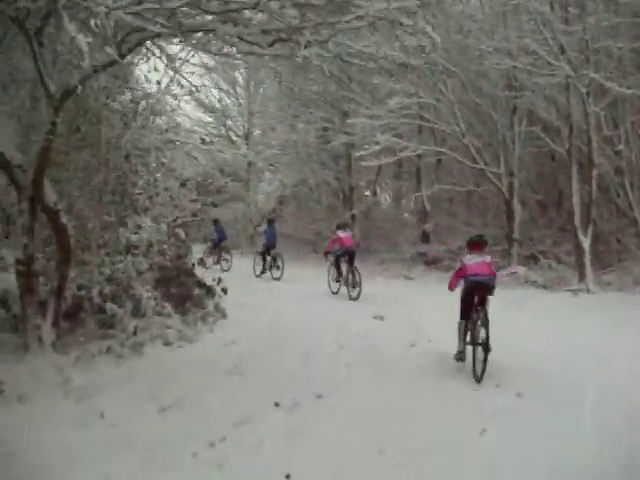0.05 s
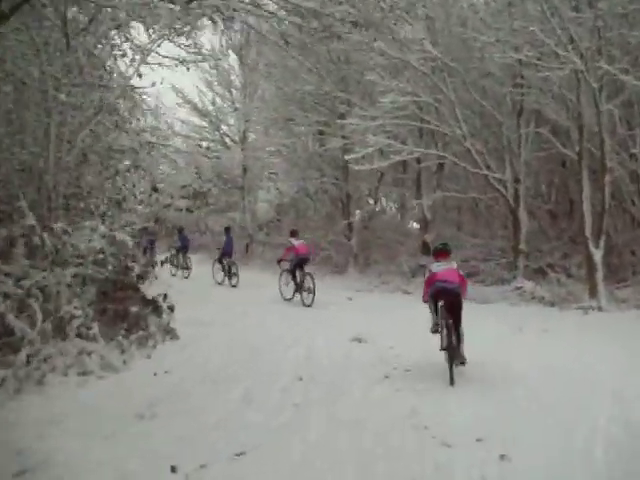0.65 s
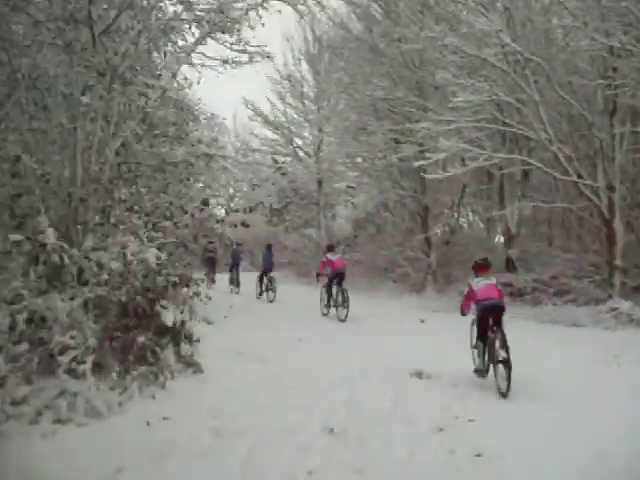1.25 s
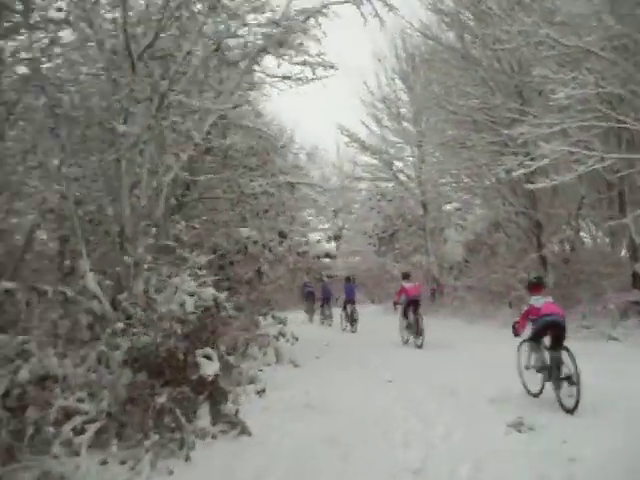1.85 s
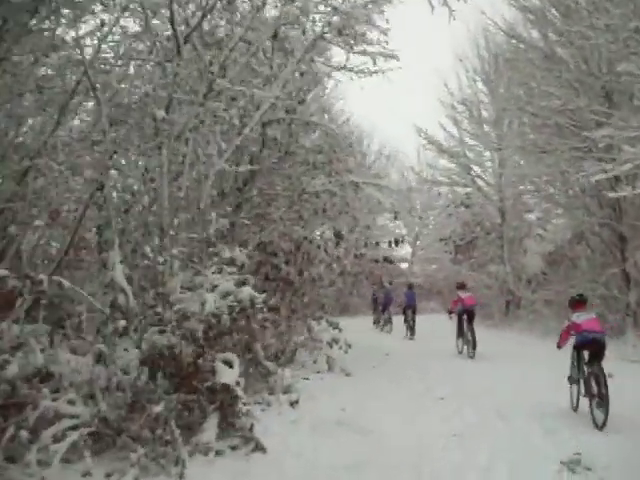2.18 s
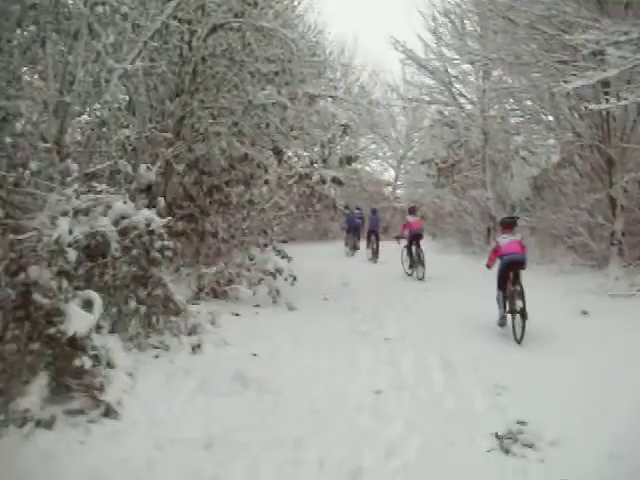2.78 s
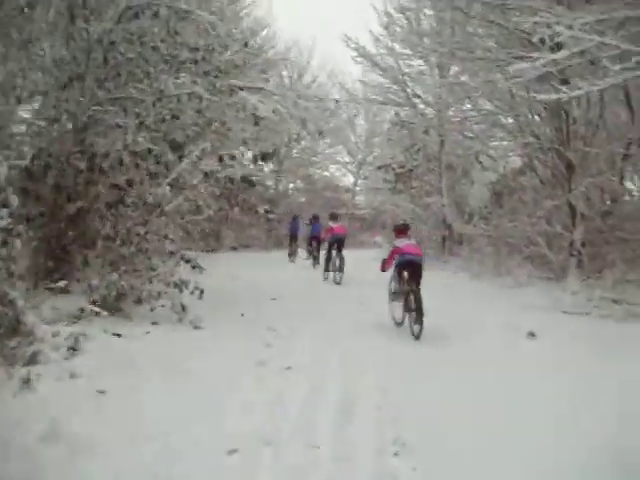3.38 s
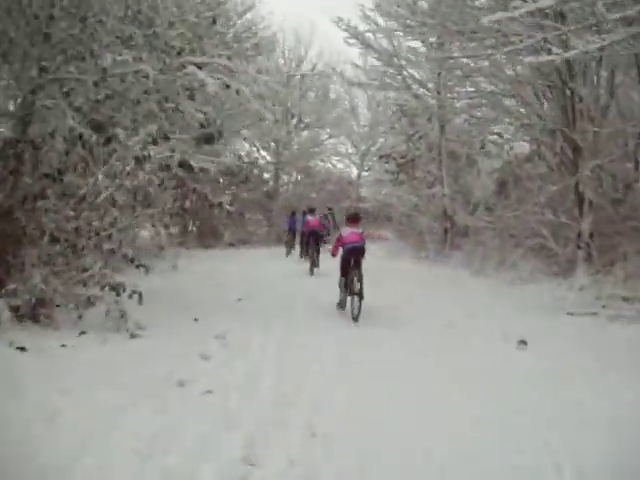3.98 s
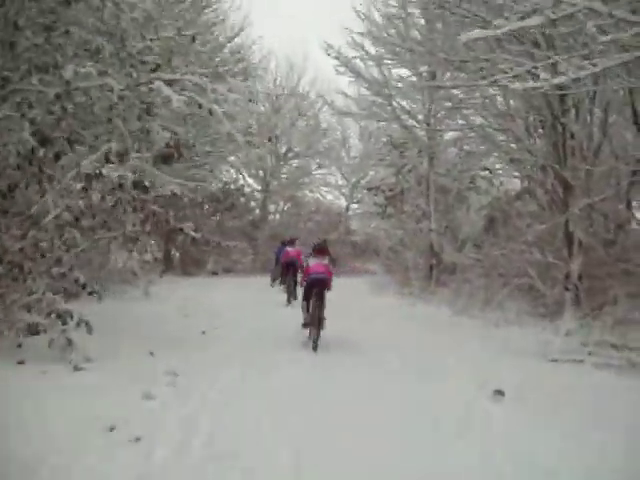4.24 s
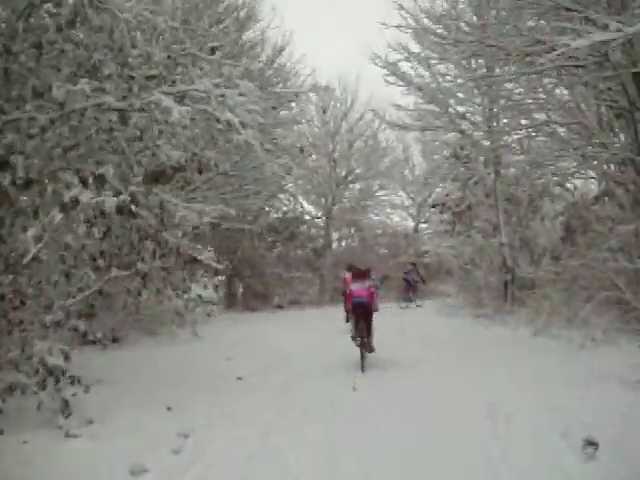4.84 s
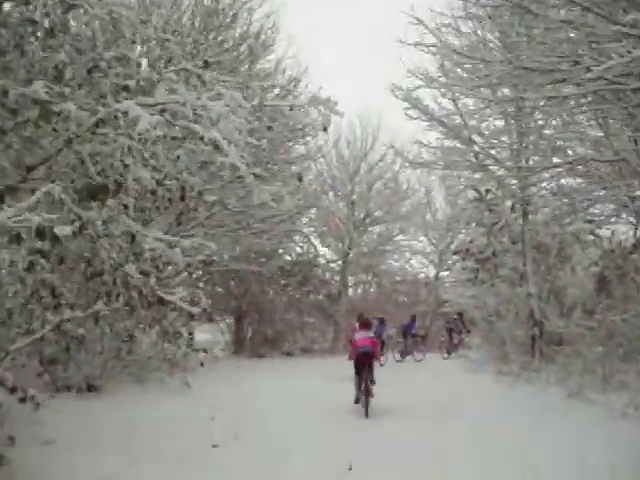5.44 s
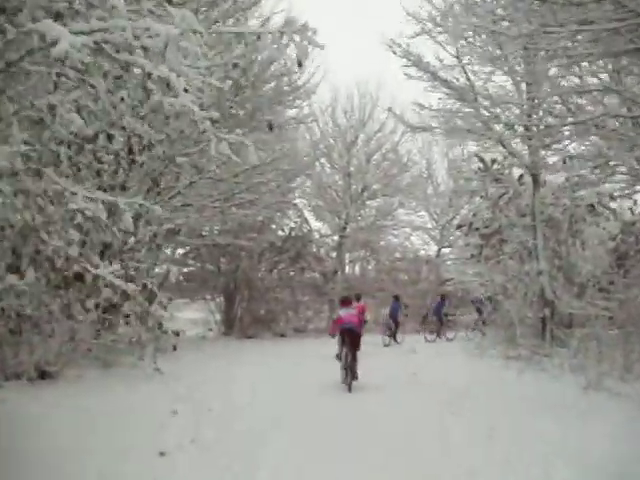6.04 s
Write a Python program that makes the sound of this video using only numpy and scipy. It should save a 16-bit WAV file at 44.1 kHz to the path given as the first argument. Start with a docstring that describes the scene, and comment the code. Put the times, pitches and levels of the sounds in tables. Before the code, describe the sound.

Low, lumpy wind buffets a microphone fixed to a bicycle riding outdoors over snow. A quick chain rattle and one loud, sharp crack come within the first second. After that, clusters of dull knocks and small ticks mark the bumps, over a soft hiss and crunch from the tyres. A faint hum joins about halfway, and the wind eases near the end. Everything sounds close and slightly muffled.

```python
"""Bicycle on a snowy path

A woodland path, heard from a small camera mounted on the bicycle: one narrow-band microphone, all close.
Wind eddies rumble right on its port; just below, the tyres hiss and crunch as they pack the snow.
Ruts and bumps make the camera judder and knock in its mount, and one hard crack overloads the input.
Grit ticks on the bicycle, the chain slaps once, and two low hums come and go as it rolls."""
import sys
import numpy as np
from scipy import signal
from scipy.fft import rfft, irfft, next_fast_len
from scipy.io import wavfile

SR = 44100
rng = np.random.default_rng(int(sys.argv[2]) if len(sys.argv) > 2 else 0)


def master(y):
    """Save y as 16-bit WAV."""
    cut = np.clip(np.atleast_2d(y).T, -1, 1)
    pcm = np.round(cut * 32767)  # scale
    wavfile.write(sys.argv[1], SR, pcm.astype(np.int16))


N = 273861
TIME = np.arange(N) / SR

# the camera knocks in its mount, each knock with its own strength and pitch:
# (time [s], strength [dB], pitch [Hz])
MOUNT_KNOCKS = [(0.065, -14, 410), (0.0849, -17, 400), (0.4681, -20, 430), (0.5842, -22.5, 300),
                (0.658, -21.5, 380), (0.7134, -11, 336), (0.7725, -14.5, 280), (0.7901, -17, 320),
                (1.2153, -19, 310), (1.9905, -12, 526), (2.0166, -15.5, 420), (2.065, -21.5, 660),
                (2.1197, -18, 410), (2.196, -16, 217), (2.322, -17.5, 325), (2.3739, -19, 280),
                (2.4653, -20.5, 260), (2.539, -13, 405), (2.5549, -14, 640), (2.7717, -15, 360),
                (2.8735, -15, 346), (2.9481, -21.5, 364), (3.0423, -21.5, 420), (3.055, -19.5, 252),
                (3.8043, -18.5, 410), (3.9218, -17.5, 245), (4.2698, -18, 225), (4.4318, -17, 301),
                (4.8078, -14.5, 307), (4.8335, -19, 456), (4.8726, -13.5, 360), (4.9032, -14.5, 423),
                (4.9293, -17.5, 260), (4.94, -12, 356), (4.9564, -15, 320), (5.1522, -12.5, 285),
                (5.5218, -24, 230), (5.8759, -23.5, 380)]


def from_db(db):
    return 10 ** (np.asarray(db) / 20)


def rms_one(x):
    return x / np.sqrt(np.mean(x ** 2) + 1e-20)


def together_db(envelopes):
    """Level of unrelated sounds whose powers add."""
    return 10 * np.log10(sum(e ** 2 for e in envelopes))


def drift(hz):
    """Slow random wander with spread 1."""
    step, settle = 40, 2000
    pole = np.exp(-2 * np.pi * hz * step / SR)
    noise = rng.standard_normal(N // step + settle + 2)
    slow = signal.lfilter([1], [1, -2 * pole, pole * pole], noise)[settle:]
    return np.interp(np.arange(N) / step, np.arange(len(slow)), rms_one(slow))


def coloured(x, spectrum):
    """Causal (minimum-phase) filter with the given spectrum and a power gain of 1."""
    size = next_fast_len(N + SR // 2) * 2
    hz, db = np.transpose(spectrum)
    bin_hz = np.arange(size // 2 + 1) * SR / size
    gain = rms_one(from_db(np.interp(np.log(bin_hz + 1), np.log(hz), db)))
    cepstrum = irfft(np.log(gain))
    cepstrum[1:size // 2] *= 2
    cepstrum[size // 2 + 1:] = 0
    return irfft(rfft(x, size) * np.exp(rfft(cepstrum)))[:N]


def grains(per_s, spread_db):
    """Clicks at random moments, of uneven size and sign; rms 1."""
    sizes = from_db(spread_db * np.minimum(rng.exponential(1, N), 3)) * rng.choice([-1, 1], N)
    return rms_one(sizes * (rng.random(N) < per_s / SR))


def burst(start, db, t60):
    """Envelope that starts at once and dies away."""
    return (TIME >= start) * from_db(db - 60 * np.clip((TIME - start) / t60, 0, 3))


def held(start, end, attack_s, t60):
    """Envelope that rises to 1 by the start, holds to the end and dies away."""
    rise = np.clip(1 + (TIME - start) / attack_s, 0, 1)
    return rise * from_db(-60 * np.clip((TIME - end) / t60, 0, 3))


def ring(clicks, hz, t60):
    """A unit click sets a decaying sine of height 1 ringing."""
    decay, angle = from_db(-60 / (t60 * SR)), 2 * np.pi * hz / SR
    return signal.lfilter([0, np.sin(angle)], [1, -2 * decay * np.cos(angle), decay ** 2], clicks + 1e-18)


def jolt(at, db, hz, recovery=0.72):
    """A brief push on the microphone: pressure swings up, then down in a slower, shallower rebound."""
    out, centre = np.zeros(N), int(at * SR)
    near = slice(max(centre - SR // 100, 0), centre + SR // 100)
    pace = np.where(TIME[near] < at, 1, recovery)
    phase = 2 * np.pi * hz * pace * (TIME[near] - at)
    out[near] = -from_db(db) * pace * phase * np.exp((1 - phase ** 2) / 2)
    return out


def wind(airflow_db, lumpy_db, small_eddy_hz=60.3, extra_db_per_db=0.27):
    """Eddies right on the microphone port: a lumpy low rumble, brighter in strong wind."""
    # steady airflow over the microphone: (time [s], level [dB])
    airflow = [(0.0, -20.5), (0.86, -41), (1.12, -32.5), (1.45, -27), (2.11, -24), (2.37, -29.5),
               (2.92, -26), (3.13, -36.5), (3.42, -32), (3.81, -32), (4.05, -34.5), (4.29, -38),
               (4.65, -29), (5.22, -36), (6.21, -39.5)]
    # bell-shaped gusts on top of it: (crest time [s], level [dB], length [s])
    gusts = [(0.122, -24, 0.066), (0.465, -28.5, 0.12), (0.795, -29, 0.07), (1.742, -28.5, 0.053),
             (1.905, -22, 0.042), (2.165, -23.5, 0.12), (2.862, -20, 0.11), (3.063, -29, 0.098),
             (3.648, -20, .06), (3.792, -27, 0.054), (3.93, -26, 0.071), (4.261, -24.5, 0.034),
             (4.555, -23, 0.067), (4.706, -21.5, 0.069), (5.865, -33, 0.13)]
    # spectrum of the eddies: (frequency [Hz], relative level [dB])
    eddy_spectrum = [(15, -5), (25, 0.5), (50, -1.5), (80, -3), (110, -8), (150, -11), (200, -15.5),
                     (400, -32.5), (1000, -42.5), (6000, -79)]
    steady = from_db(np.interp(TIME, *np.transpose(airflow)) + airflow_db)
    swells = [from_db(db) * np.exp(-2 * np.minimum(((TIME - at) / length) ** 2, 20))
              for at, db, length in gusts]
    level_db = together_db([steady] + swells)
    eddies = coloured(rng.standard_normal(N), eddy_spectrum) * from_db(lumpy_db * drift(15))
    large = signal.sosfilt(signal.butter(1, small_eddy_hz, fs=SR, output="sos"), eddies)
    small = (eddies - large) * from_db(extra_db_per_db * (level_db - level_db.mean()))
    return from_db(level_db) * rms_one(large + small)


def shaking(ride_db, aftershake_db=-18.5):
    """Level of the mount's shaking in dB: steady from the ride, stronger in ruts and after each knock."""
    # road noise in the mount, set by the riding speed: (time [s], level [dB])
    ride = [(0.0, -36.5), (0.6, -36), (0.88, -40.5), (2.35, -39), (2.7, -35), (3.44, -37), (4.81, -37),
            (6.21, -39.5)]
    # rutted stretches of the path: (start [s], length [s], level [dB])
    ruts = [(0.015, 0.067, -29), (0.251, 0.052, -34), (0.575, .1, -35.5), (1.073, 0.2, -37),
            (1.406, 0.035, -32), (2.096, 0.12, -32), (2.326, 0.064, -32.5), (2.614, .16, -33.5),
            (3.211, 0.019, -33.5), (3.44, .06, -36), (4.294, 0.054, -31.5), (4.513, .05, -29),
            (4.837, 0.095, -32), (5.033, 0.039, -34.5), (5.512, 0.024, -37.5), (5.862, .06, -35.5),
            (6.007, 0.025, -32.5)]
    steady = from_db(np.interp(TIME, *np.transpose(ride)) + ride_db)
    in_ruts = [from_db(db) * held(at, at + length, attack_s=0.016, t60=0.087) for at, length, db in ruts]
    after_knocks = [burst(at, db + aftershake_db, t60=0.15) for at, db, _ in MOUNT_KNOCKS]
    return together_db([steady] + in_ruts + after_knocks)


def judder(shake_db, uneven_db, smooth_db):
    """The rough path, heard through the mount: many small dull contacts over a steady road noise."""
    # spectrum of the shaking mount: (frequency [Hz], relative level [dB])
    mount_spectrum = [(20, -32), (100, -13), (160, -3), (290, 2), (450, -3), (680, -4.5), (850, -9),
                      (1100, -21.5), (2000, -24), (6000, -40)]
    contacts = grains(per_s=260, spread_db=3.5) * from_db(uneven_db * drift(25))
    road = from_db(smooth_db) * rng.standard_normal(N)
    return from_db(shake_db) * rms_one(coloured(contacts + road, mount_spectrum))


def tyres(shake_db, level_db, crunch_db, clump_db, level_follows=0.08, crunch_follows=0.2):
    """Snow packs under the tyres below: a hiss with clumps of tiny fractures, louder on rough ground."""
    # spectrum of tyres on snow: (frequency [Hz], relative level [dB])
    snow_spectrum = [(20, -9.5), (300, -3), (800, 7), (1100, 4.5), (1350, 4.5), (1700, -2), (2700, 1),
                     (3250, -3.5), (4400, -3), (5200, -10), (6000, -11)]
    level = from_db(level_db + level_follows * (shake_db - np.median(shake_db)))
    rough_db = crunch_follows * (shake_db - shake_db.mean())
    crunch = grains(per_s=900, spread_db=9.5) * from_db(crunch_db + rough_db + clump_db * drift(17))
    return level * rms_one(coloured(rng.standard_normal(N) + crunch, snow_spectrum))


def knocks(push_db, edge_db, edge_ratio, ring_db, ring_lead_s=0.0008, edge_db_per_db=0.17):
    """Each bump jolts the camera, with a steep edge at contact, and rings the case round the microphone."""
    # modes of the camera case: (frequency [Hz], relative level [dB], t60 [s])
    case_modes = [(315, -13, 0.04), (600, -24.5, 0.14), (790, -35.5, 0.0047), (1310, -28.5, 0.11),
                  (1750, -31, 0.0025), (2700, -36, 0.0075)]
    times, strength_db, _ = np.transpose(MOUNT_KNOCKS)
    out = np.zeros(N)
    for at, db, hz in MOUNT_KNOCKS:
        sharpen_db = edge_db_per_db * (db - strength_db.mean())
        out += jolt(at, db + push_db, hz)
        out += jolt(at, db + edge_db + sharpen_db, hz * edge_ratio)
    scatter_db = rng.normal(0, 3.8, (len(times), len(case_modes)))  # no two knocks ring alike
    onsets = ((times - ring_lead_s) * SR).astype(int)
    for k, (hz, mode_db, t60) in enumerate(case_modes):
        clicks = np.zeros(N)
        clicks[onsets] = from_db(strength_db + ring_db + mode_db + scatter_db[:, k])
        out += ring(clicks, hz, t60)
    return out


def grit(gain_db):
    """Snow crunches under a tyre and grit ticks on the bicycle: short bursts of noise, close by."""
    # single crunches and ticks: (time [s], level [dB], t60 [s])
    ticks = [(0.123, -30.5, .06), (0.413, -23, 0.023), (0.467, -26, 0.044), (1.165, -26.5, 0.02),
             (2.118, -30.5, 0.027), (2.359, -31, 0.14), (2.552, -23, 0.017), (2.875, -27, 0.018),
             (2.947, -25.5, 0.019), (3.042, -30, 0.084), (3.235, -28, .03), (3.449, -34.5, .02),
             (3.5, -28, 0.036), (3.622, -30.5, 0.044), (3.945, -32.5, 0.09), (4.46, -35, .2),
             (5.011, -32, 0.036), (5.633, -32, 0.12), (6.087, -32.5, 0.066)]
    # their spectrum: (frequency [Hz], relative level [dB])
    grit_spectrum = [(60, -11.5), (700, 9.5), (1400, 0), (2900, -2.5), (4000, -13.5), (6000, -20)]
    envelope = sum(burst(at, db + gain_db, t60) for at, db, t60 in ticks)
    return coloured(envelope * rng.standard_normal(N), grit_spectrum)


def chain():
    """The chain slaps close by and rattles out in dense, bright clicks."""
    # the slap, then its rattle: (time [s], level [dB], t60 [s])
    slap_and_rattle = [(.3115, -18.5, .02), (.320, -29, .14)]
    # spectrum of the chain: (frequency [Hz], relative level [dB])
    chain_spectrum = [(60, -17), (900, 3), (2000, 0.5), (4800, -7.5), (6500, -16)]
    envelope = sum(burst(*row) for row in slap_and_rattle)
    return coloured(envelope * grains(per_s=9000, spread_db=1), chain_spectrum)


def hums(wander=0.008):
    """The rolling bicycle hums: nearly pure low tones that waver a little in pitch and level."""
    # a brief hum and a long one: (start [s], end [s], pitch [Hz], level [dB])
    tones = [(0.587, 0.838, 170.3, -34.5), (3.6, 6.216, 79, -40.5)]
    out = np.zeros(N)
    for start, end, hz, db in tones:
        phase = 2 * np.pi * np.cumsum(hz * (1 + wander * drift(2.07))) / SR
        envelope = held(start, end, attack_s=0.04, t60=0.2) * from_db(db + drift(4.6))
        out += envelope * np.sqrt(2) * np.sin(phase)
    return out


def crack():
    """One hard crack on the camera case, right at the microphone."""
    # the blow: (time [s], peak [dB], pitch [Hz])
    blow = (.7127, 3.5, 3600)
    return jolt(*blow)


def scene():
    """Wind, mount, tyres and bicycle, all close to one microphone in the open air."""
    shake_db = shaking(ride_db=0.63)
    air = wind(airflow_db=0.8, lumpy_db=1.5)
    mount = judder(shake_db, uneven_db=2.5, smooth_db=-3.0)
    mount += knocks(push_db=2.5, edge_db=-14.5, edge_ratio=4.1, ring_db=-0.5) + crack()
    snow = tyres(shake_db, level_db=-44.5, crunch_db=-9.0, clump_db=3.5)
    bicycle = grit(gain_db=-1.5) + chain() + hums()
    return (air + mount + snow + bicycle)[None]


def record(dry, mic_top_hz=5650, ceiling=0.76, cutoff_hz=16500):
    """The camera's narrow-band microphone, whose input overloads on the hardest peak."""
    mic_response = signal.firwin(181, mic_top_hz, window=("kaiser", 9), fs=SR)
    narrow = signal.fftconvolve(dry, mic_response[None], "same")
    clipped = np.clip(narrow, -ceiling, ceiling)
    return signal.sosfilt(signal.cheby2(12, 70, cutoff_hz, fs=SR, output="sos"), clipped)


dry = scene()
out = record(dry)
master(out)
```